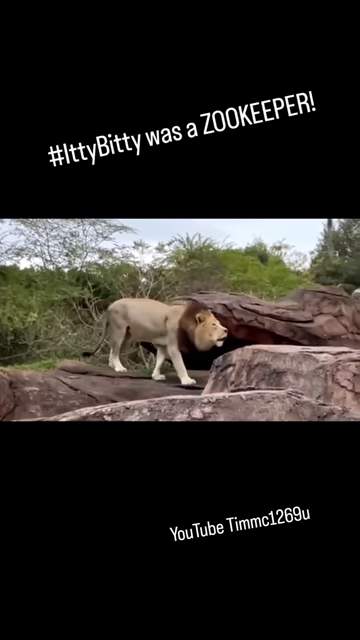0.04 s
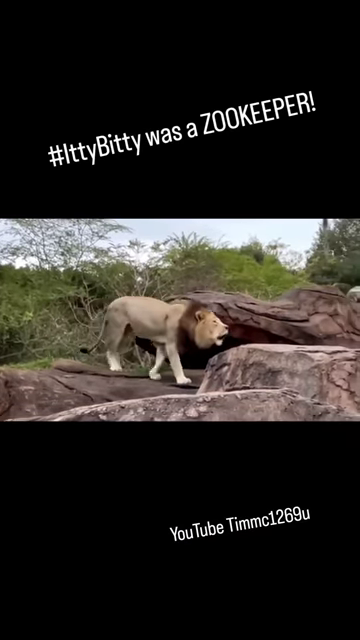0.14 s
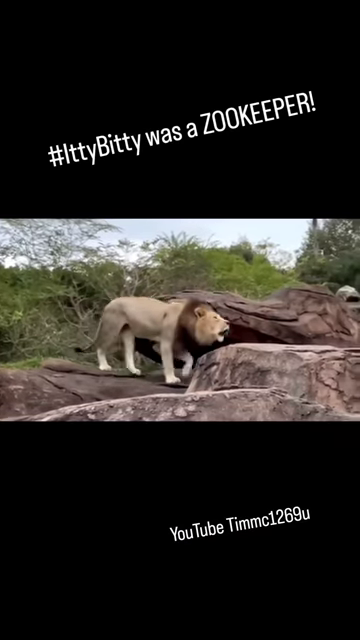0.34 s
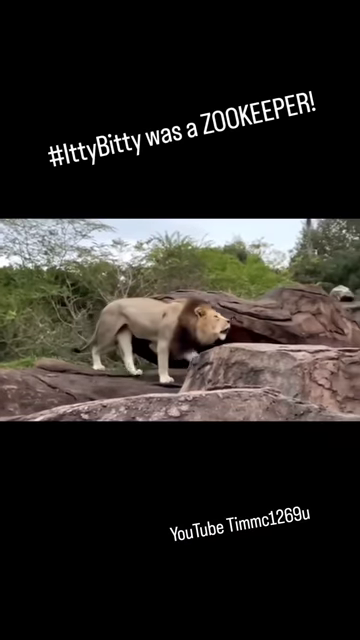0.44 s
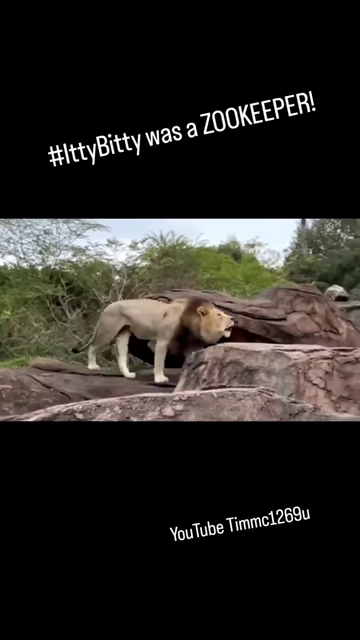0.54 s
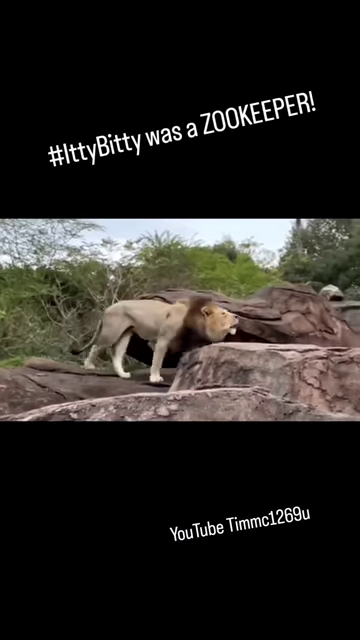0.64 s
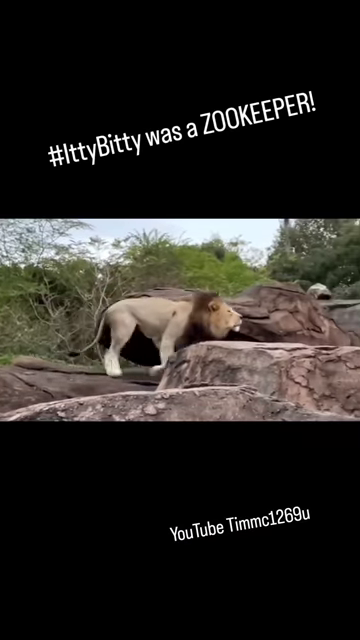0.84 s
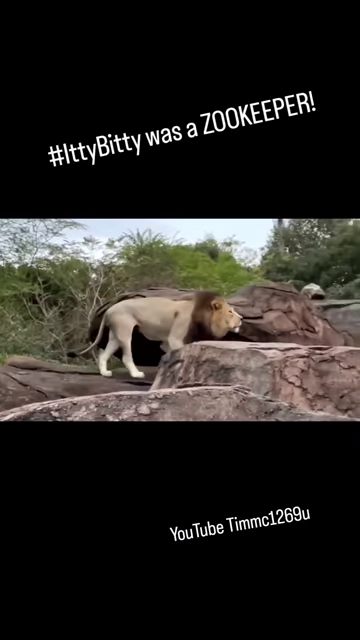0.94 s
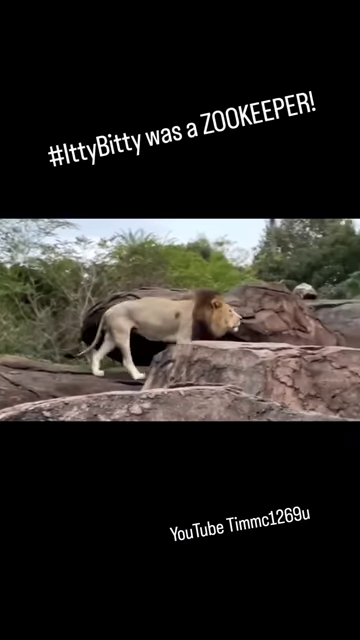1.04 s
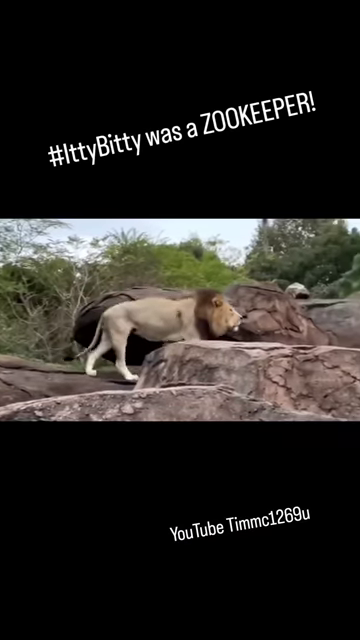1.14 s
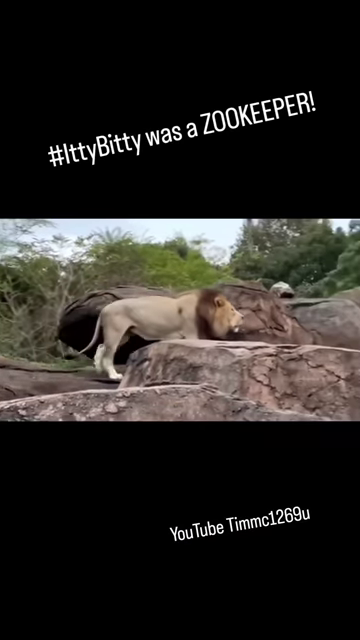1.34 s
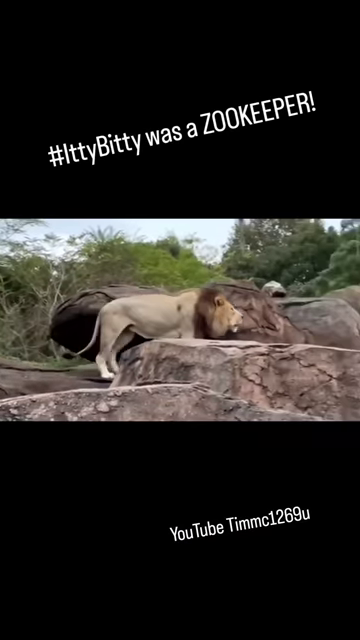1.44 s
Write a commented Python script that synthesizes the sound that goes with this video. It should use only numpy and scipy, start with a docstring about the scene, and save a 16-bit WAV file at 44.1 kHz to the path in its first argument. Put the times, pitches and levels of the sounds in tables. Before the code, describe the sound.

One deep, hoarse lion roar outdoors swells, falls and sinks into a rattling growl over faint rumble.

```python
"""A low, uneven outdoor rumble leads into one deep lion roar among the rocks of an enclosure.
The voice starts as a clean rising moan, turns hoarse as the jaws open, swells into a hollow falling tone
and sinks into a low rattling growl. Cosine harmonics and thin overtones make the clean tone; jittered
flaps and puffs of noise through chest, throat, mouth and teeth make the hoarse one. Sparse decaying
taps form the rocks' short echo; shaped noise forms the rumble and the faint open air."""
import sys
import numpy as np
from scipy import signal
from scipy.fft import rfft, irfft
from scipy.io import wavfile
from scipy.ndimage import uniform_filter1d, minimum_filter1d

SR = 44100
rng = np.random.default_rng(int(sys.argv[2]) if len(sys.argv) > 2 else 0)


def master_out(mix):
    """Clip the mix to full scale and print it as 16-bit PCM to the path in sys.argv[1]."""
    frames = np.transpose(np.atleast_2d(mix))
    ceiling = np.clip(frames, -1, 1)
    pcm = np.round(ceiling * 32767).astype(np.int16)
    wavfile.write(sys.argv[1], SR, pcm)


N = 66150  # 1.5 s

# All layer levels are relative: trims, where given, are added to them.
# pitch of the vocal folds: time_s, pitch_hz
PITCH = [(.17,137.7),(.21,151.1),(.24,169.9),(.275,215.1),(.31,202),(.36,192.4),(.42,212.1),(.46,210.8),(.49,200.5),(.52,171.9),(.6,172.8),(.635,182.6),(.68,175.5),(.72,167.4),(.78,161.7),(.84,151.7),(1.0,139.9),(1.09,133.8),(1.17,90.06),(1.22,61.2)]
# first harmonic of the moan: time_s, level_db
FIRST_HARMONIC = [(.178,-39),(.2,-28),(.23,-12),(.26,-14),(.28,-9.5),(.305,-27),(.33,-40),(.385,-36),(.42,-23.5),(.45,-18),(.485,-33.5),(.53,-39),(.555,-29),(.6,-42.5),(.66,-28),(.7,-18),(.75,-11),(.82,-17),(.87,-18.5),(.92,-30),(1.02,-48),(1.11,-21),(1.16,-61),(1.21,-23.5),(1.245,-42)]
# second harmonic of the moan: time_s, level_db
SECOND_HARMONIC = [(.19,-46),(.25,-28.5),(.28,-21.5),(.31,-34),(.36,-30.5),(.45,-31.5),(.49,-15.5),(.515,-27),(.6,-19),(.64,-9.5),(.68,-6.5),(.715,-26.5),(.745,-21),(.79,-39),(.96,-31.5),(1.06,-30.5)]
# third harmonic of the moan: time_s, level_db
THIRD_HARMONIC = [(.18,-36.5),(.24,-34.5),(.28,-27.5),(.32,-54.5),(.68,-31),(.72,-17.5),(.785,-10),(.805,-16.5),(.83,-13.5),(.87,-39),(.99,-38),(1.06,-44)]
# how far the first harmonic slips flat of the others: time_s, drop_share_of_pitch
SAG = [(.36,0.0065),(.405,0.26),(.46,0.14),(.52,0),(.71,0.0021),(.765,0.049),(.83,0.0019)]
# thin overtones that ring out of the throat: start_s, peak_s, end_s, pitch_hz, level_db
RINGS = [(0.346,0.409,.51,322.7,-31.5),(0.542,0.626,0.66,962,-21.5),(0.547,0.577,0.58,1115,-30.5),(0.93,0.991,1.015,838,-29),(0.97,1.014,1.096,270,-23.5)]
CLEAN_TRIM_DB, FOURTH_DB = 1.5, -19  # the fourth harmonic is set against the second
JITTER_SHARE, JITTER_HZ = 0.01, 66.6
RING_WANDER_SHARE, RING_WANDER_HZ = 0.01027, 51

# breath noise in the drive of the throat: time_s, noise_share (0-1)
ROUGHNESS = [(.17,.6),(.33,.4),(.45,.35),(.6,.22),(.72,.5),(.85,.38),(1.0,.36),(1.15,.8)]
FLAPS_PER_CYCLE = 2 / 3  # flaps of the folds for each cycle of the tone
FLAP_JITTER_SHARE, FLAP_UNEVEN_DB = .03, 2.5
PUFF_DECAY_CYCLES, PUFF_FLOOR = 0.59, 0.39

# growl of the slack folds in the chest: time_s, level_db
GROWL = [(.17,-42.5),(.19,-22.5),(.28,-29.5),(.33,-16.5),(.385,-44.5),(.5,-30),(.65,-37),(.76,-29.5),(.82,-19.5),(.93,-17),(1.0,-25.5),(1.07,-19),(1.17,-25.5),(1.28,-39),(1.38,-28.5),(1.5,-34.5)]
# centre of the chest resonance: time_s, centre_hz
CHEST = [(.17,148),(.29,217),(.335,258),(.38,217),(.45,190.4),(.6,205),(.76,213.7),(.82,222),(.93,208),(1.0,173),(1.05,150.7),(1.2,115),(1.38,170.4),(1.5,130)]
# hoarse voice from the throat: time_s, level_db
HOARSE = [(.177,-69),(.185,-41.5),(.23,-31.5),(.28,-28.5),(.305,-32.5),(.34,-28),(.4,-29.5),(.48,-26),(.53,-29),(.575,-24),(.68,-25),(.78,-27),(.87,-28.5),(.92,-26.5),(.99,-33),(1.05,-29),(1.11,-37),(1.2,-70),(1.3,-62),(1.5,-76)]
# throat resonances before the opening factor: centre_hz, width_hz, level_db
THROAT = [(289,49,-8),(425.7,68.7,9),(571,142,2),(667,210,-7.5),(837,140,-6.5),(944.4,82,-3.5),(1114,143,-3.5)]
# narrow, wavering throat resonance: time_s, centre_hz
BRAY = [(.2,777),(.35,790),(.43,886),(.51,683),(.6,653),(.65,776),(.71,684),(.8,799.9),(.89,886),(.96,826),(1.0,812),(1.04,737.4)]
# rasp in the open mouth: time_s, level_db
RASP = [(.18,-70),(.21,-48.5),(.27,-43.5),(.32,-34.5),(.37,-40.5),(.395,-31),(.45,-33),(.48,-41.5),(.55,-45.5),(.65,-36.5),(.72,-47.5),(.77,-38),(.82,-42),(.89,-37.5),(.93,-35),(.98,-40.5),(1.06,-41.5),(1.13,-54.5),(1.3,-70)]
# mouth resonances before the opening factor: centre_hz, width_hz, level_db
MOUTH = [(1670,390,12),(2130,180,9.5),(3130,870,-12.5)]
# opening of the mouth, scaling throat and mouth resonances: time_s, factor
OPENING = [(.17,0.98),(.27,0.98),(.35,1.016),(.45,1.071),(.65,0.963),(.9,1.006),(1.0,1.027),(1.2,0.83)]
# main resonance of the mouth, not scaled by the opening: time_s, centre_hz
JAWS = [(.2,2300),(.29,2400),(.355,3070),(.385,2403),(.42,2260),(.45,1780),(.56,1830),(.65,2135),(.71,2200),(.77,2960),(.83,2418),(.88,2169),(.97,2350),(1.05,2487)]
# hiss of air past the teeth: time_s, level_db
HISS = [(.18,-61.5),(.216,-51),(.31,-47.5),(.37,-50.5),(.41,-43.5),(.5,-58),(.62,-48.5),(.75,-47),(.88,-42),(.93,-45.5),(.96,-39),(1.05,-45),(1.1,-52.5),(1.25,-68.5)]
# relative spectrum of that hiss: frequency_hz, density_db_per_hz
HISS_COLOUR = [(1500,-44),(2600,7.5),(3500,3.5),(5000,1.5),(7300,-1),(8300,-29.5),(9500,0.5),(11300,-21),(12600,-9.5),(14200,-13)]
GROWL_TRIM_DB, HOARSE_TRIM_DB, RASP_TRIM_DB, HISS_TRIM_DB = -2.5, 1, -6.5, -2
CHEST_WIDTH_HZ, BRAY_WIDTH_HZ, JAWS_WIDTH_HZ = 75, 57, 400
BRAY_DB, JAWS_DB = -9.5, -0.5  # within the throat and the mouth

# first echoes off the nearest rocks: delay_s, level_db
SLAPS = [(.0047,-14),(0.0124,-20.5),(0.018,-32)]
# decay of the rocks' echo: frequency_hz, t60_s
ROCKS = [(100,0.3),(500,0.8),(2000,0.59),(6000,0.27),(12000,0.11)]
CLEAN_WET_DB, ROUGH_WET_DB = -21, -12  # echo sends

# relative spectrum of the low rumble: frequency_hz, density_db_per_hz
RUMBLE_COLOUR = [(12,-52),(25,-29.5),(40,-5),(58,3),(80,3.5),(110,-9),(200,-32.5),(500,-78.5)]
# rise and fall of the rumble: time_s, level_db
RUMBLE = [(0,-35.5),(.12,-35.5),(.18,-26.5),(.24,-39),(.4,-44.5),(.53,-34.5),(.65,-38.5),(.76,-30),(.92,-40.5),(1.02,-28.5),(1.12,-34),(1.22,-28),(1.265,-39),(1.33,-25),(1.4,-29.5),(1.5,-32.5)]
# relative spectrum of the open air: frequency_hz, density_db_per_hz
AIR = [(15, -30), (25, -23), (85, -21), (197, -11), (326, -27), (599, -22), (741, -28), (3530, -46),
       (6500, -56.5), (8240, -86.5), (9410, -56), (14000, -80)]
AIR_DB = -49

EDGE_S, FADE_S = .006, .004  # fades past a level curve's ends; fades at the ends of the sound
CEILING, LIMITER_SIZE = .96, 441  # peak amplitude; window in samples
CUTOFF_HZ = 14500


def moan():
    """The clean tone of the folds: its strength passes from one low harmonic to the next."""
    pitch = curve(PITCH) * (1 + JITTER_SHARE * wander(JITTER_HZ))
    second_gain = level(SECOND_HARMONIC)
    partials = [
        (pitch * (1 - curve(SAG)), level(FIRST_HARMONIC)),
        (2 * pitch, second_gain),
        (3 * pitch, level(THIRD_HARMONIC)),
        (4 * pitch, amp(FOURTH_DB) * second_gain),
    ]
    tone = sum(gain * np.cos(2 * np.pi * np.cumsum(hz) / SR) for hz, gain in partials)
    return amp(CLEAN_TRIM_DB) * np.sqrt(2) * tone


def ring():
    """Thin wavering overtones that swell and fade in the throat."""
    t = np.arange(N) / SR
    tones = np.zeros(N)
    for start, peak, end, hz, db in RINGS:
        wavering_hz = hz * (1 + RING_WANDER_SHARE * wander(RING_WANDER_HZ))
        phase = 2 * np.pi * np.cumsum(wavering_hz) / SR
        swell = np.interp(t, [start, peak, end], [0, 1, 0])
        tones += amp(db) * swell * np.sqrt(2) * np.sin(phase)
    return tones


def hoarse():
    """The folds flap twice in every three cycles of the tone, puffing air into chest, throat and mouth."""
    flap_hz = FLAPS_PER_CYCLE * curve(PITCH) * (1 + FLAP_JITTER_SHARE * wander(90))
    cycle = np.cumsum(flap_hz) / SR % 1
    # one pulse at each wrap of the cycle, of uneven strength
    pulses = np.maximum(-np.diff(cycle, prepend=0), 0)
    flaps = unit(pulses * amp(FLAP_UNEVEN_DB * wander(120)))
    puff_shape = PUFF_FLOOR + np.exp(-cycle / PUFF_DECAY_CYCLES)
    puffs = unit(puff_shape * rng.standard_normal(N))

    rough = curve(ROUGHNESS)
    drive = (1 - rough) * (flaps - flaps.mean()) + rough * puffs
    airy = slaps(drive + rng.standard_normal(N))
    return chest_growl(puffs) + throat_voice(drive, puffs) + mouth_rasp(airy) + teeth_hiss(puffs)


def chest_growl(puffs):
    """Puffs of air excite one low, moving chest resonance."""
    growl = steady(resonate(puffs, curve(CHEST), CHEST_WIDTH_HZ), size=1400)
    return amp(GROWL_TRIM_DB) * level(GROWL) * growl


def throat_voice(drive, puffs):
    """Flaps and breath excite the throat's resonances; puffs alone excite a narrow bray."""
    bray = amp(BRAY_DB) * steady(resonate(puffs, curve(BRAY), BRAY_WIDTH_HZ))
    return amp(HOARSE_TRIM_DB) * level(HOARSE) * (tract(drive, THROAT) + bray)


def mouth_rasp(airy):
    """The breathy drive rasps through the mouth's resonances as the jaws move."""
    jaws = amp(JAWS_DB) * steady(resonate(airy, curve(JAWS), JAWS_WIDTH_HZ))
    return amp(RASP_TRIM_DB) * level(RASP) * (tract(airy, MOUTH) + jaws)


def teeth_hiss(puffs):
    """Air past the teeth: pulsing and steady noise share one treble colour."""
    air = slaps(puffs + rng.standard_normal(N))
    return amp(HISS_TRIM_DB) * level(HISS) * colour(air, HISS_COLOUR)


def tract(x, modes):
    """Parallel resonances that shift as the mouth opens, held at steady power."""
    return steady(sum(amp(db) * resonate(x, hz * curve(OPENING), width) for hz, width, db in modes))


def resonate(x, hz, width_hz):
    """A steep resonance follows the curve hz: shift down to zero, low-pass, shift back up."""
    turn = np.exp(2j * np.pi * np.cumsum(hz) / SR)
    r = np.exp(-np.pi * width_hz / SR)
    smoothed = signal.lfilter([(1 - r) ** 2], [1, -2 * r, r * r], x / turn)
    return 2 * (turn * smoothed).real


def slaps(x):
    """The direct sound with delayed copies off the nearest rocks."""
    t = np.arange(N) / SR
    return x + sum(amp(db) * np.interp(t - delay, t, x, left=0) for delay, db in SLAPS)


def rocks(x):
    """Sparse random echoes, each band dying at its own speed."""
    # about 2000 taps a second, starting after 8 ms
    taps = rng.standard_normal(SR) * (rng.random(SR) < 2000 / SR) * (np.arange(SR) > .008 * SR)
    hz, t, bands = signal.stft(taps, SR, nperseg=256)
    decay = amp(-60 * t / read(ROCKS, hz)[:, None])
    tail = signal.istft(bands * decay, SR, nperseg=256)[1]
    return signal.fftconvolve(x, tail / np.linalg.norm(tail))[:N]


def outdoors():
    """Shaped noise: faint open air and a low uneven rumble."""
    air = amp(AIR_DB) * colour(rng.standard_normal(N), AIR)
    rumble = level(RUMBLE) * steady(colour(rng.standard_normal(N), RUMBLE_COLOUR))
    return air + rumble


def amp(db):
    """Decibels to gain."""
    return 10 ** (np.asarray(db) / 20)


def unit(x):
    """Scales to rms 1."""
    return x / np.sqrt(np.mean(x ** 2) + 1e-20)


def curve(rows, size=260):
    """A time table at every sample, with rounded corners."""
    return uniform_filter1d(np.interp(np.arange(N) / SR, *np.transpose(rows)), size)


def level(rows):
    """Gain from a dB curve, fading out beyond its ends."""
    t = np.arange(N) / SR
    outside = np.maximum(rows[0][0] - t, 0) + np.maximum(t - rows[-1][0], 0)
    return amp(curve(rows)) * np.exp(-(outside / EDGE_S) ** 2)


def read(points, hz):
    """A frequency table's value at hz, on a log axis."""
    f, value = np.transpose(points)
    return np.interp(np.log(hz + 1), np.log(f + 1), value)


def colour(x, points):
    """Filters by a dB spectrum and scales to rms 1."""
    gain = amp(read(points, np.fft.rfftfreq(N, 1 / SR)))
    return unit(irfft(rfft(x) * gain, N))


def wander(rate_hz):
    """Low-passed random motion of rms 1."""
    gain = 1 / (1 + (np.fft.rfftfreq(N, 1 / SR) / rate_hz) ** 2) ** 2
    return unit(irfft(rfft(rng.standard_normal(N)) * gain, N))


def steady(x, size=2200):
    """Evens out the short-term power of a random drive to about 1."""
    power = uniform_filter1d(uniform_filter1d(x ** 2, size), size)
    return x / np.sqrt(power + 1e-12)


def scene():
    """The lion, its echo and the background, in mono."""
    clean = moan() + ring()
    rough = hoarse()
    echo = rocks(amp(CLEAN_WET_DB) * clean + amp(ROUGH_WET_DB) * rough)
    return (clean + rough + echo + outdoors())[None]


def record(dry):
    """A peak limiter eases the gain down around peaks over the ceiling; then soft ends and the band limit."""
    gain = minimum_filter1d(CEILING / np.maximum(abs(dry), CEILING), LIMITER_SIZE)
    t = np.arange(N) / SR
    ends = np.minimum(np.minimum(t, t[::-1]) / FADE_S, 1)
    limited = dry * uniform_filter1d(gain, LIMITER_SIZE) * ends
    lowpass = signal.firwin(511, CUTOFF_HZ, window=("kaiser", 9), fs=SR)
    return signal.oaconvolve(limited, lowpass[None], "same")


dry = scene()
out = record(dry)
master_out(out)
```